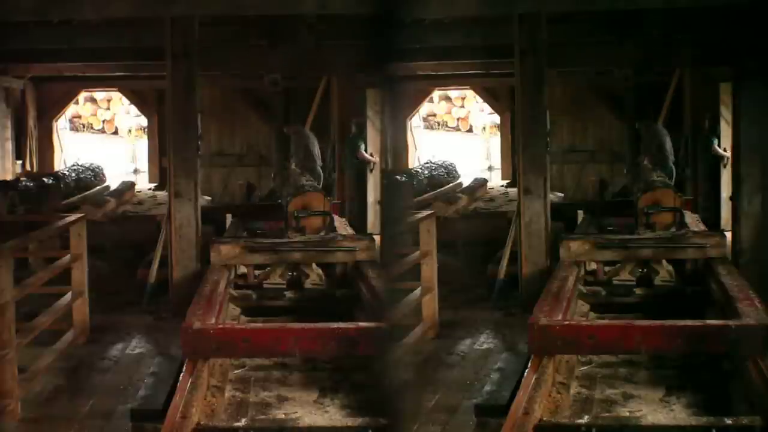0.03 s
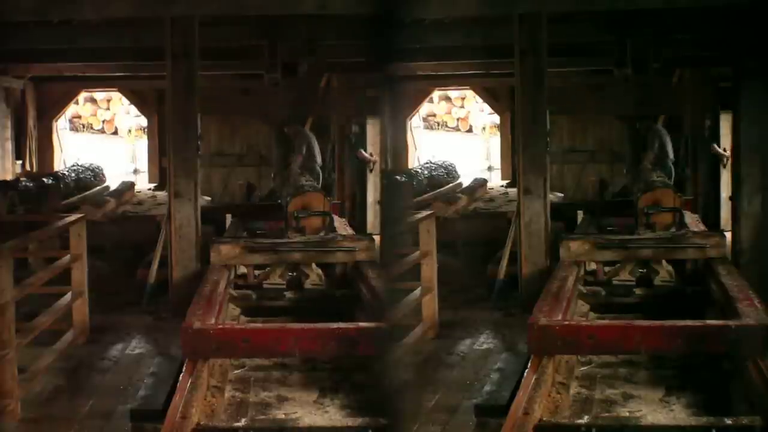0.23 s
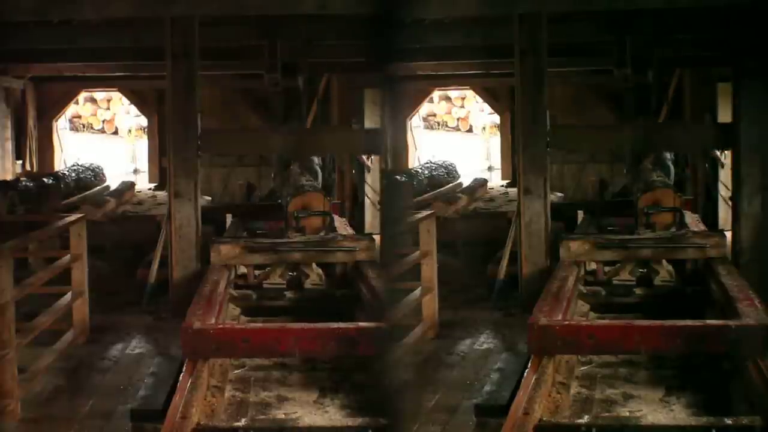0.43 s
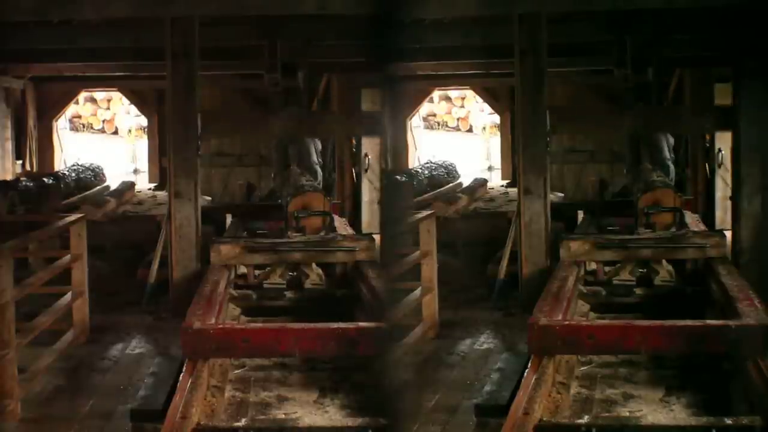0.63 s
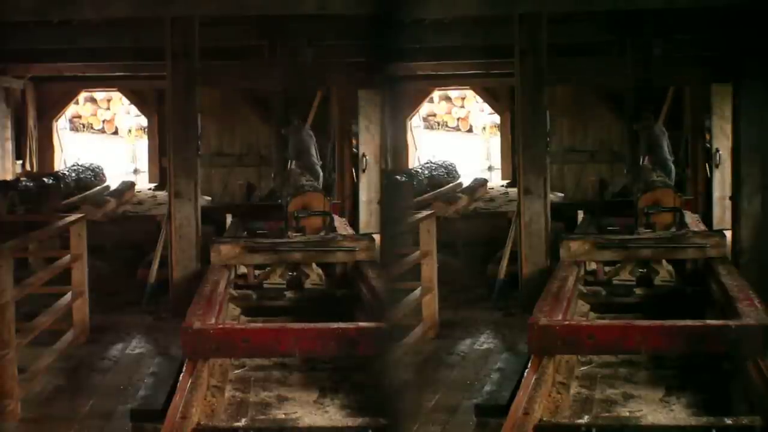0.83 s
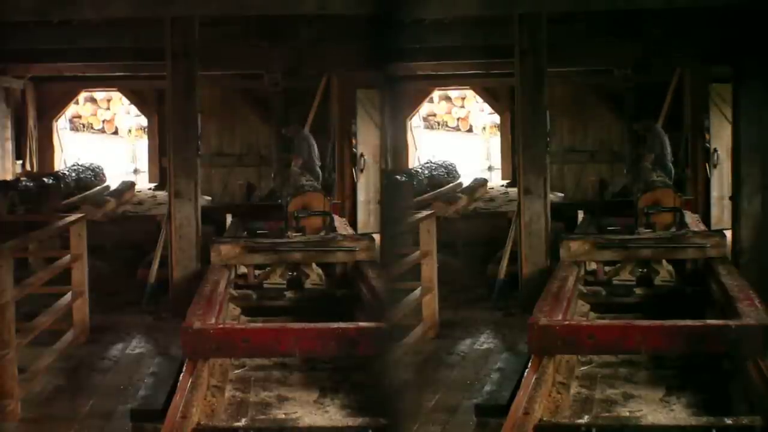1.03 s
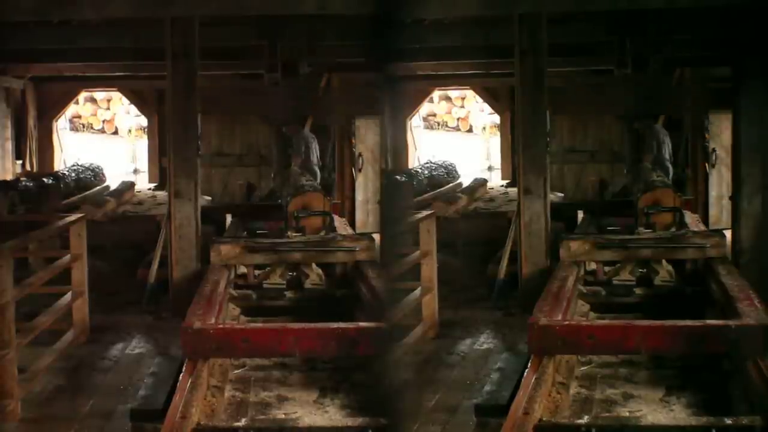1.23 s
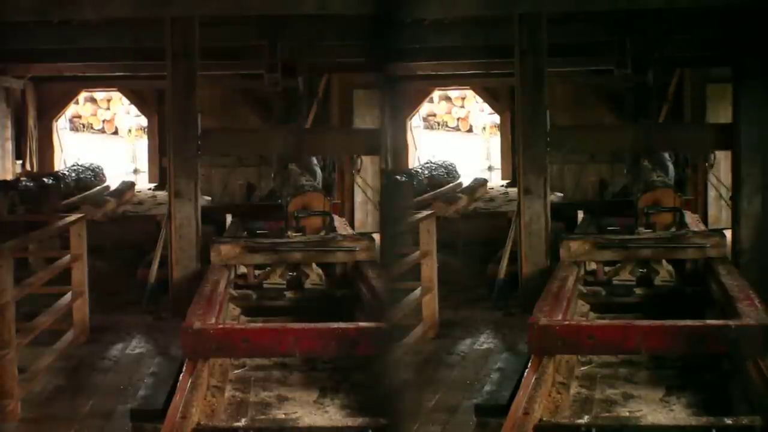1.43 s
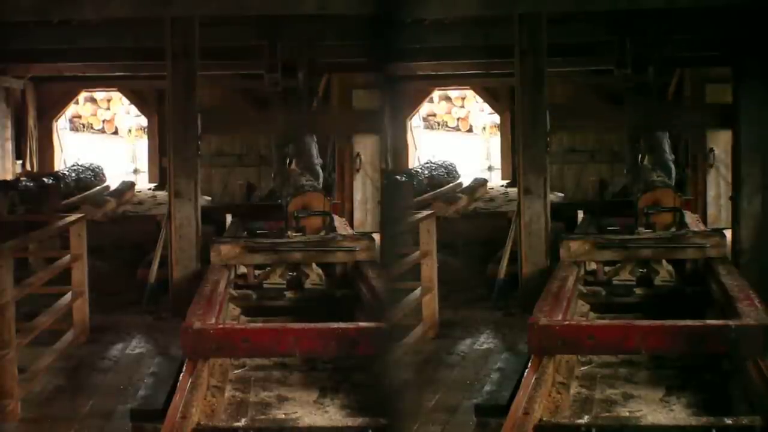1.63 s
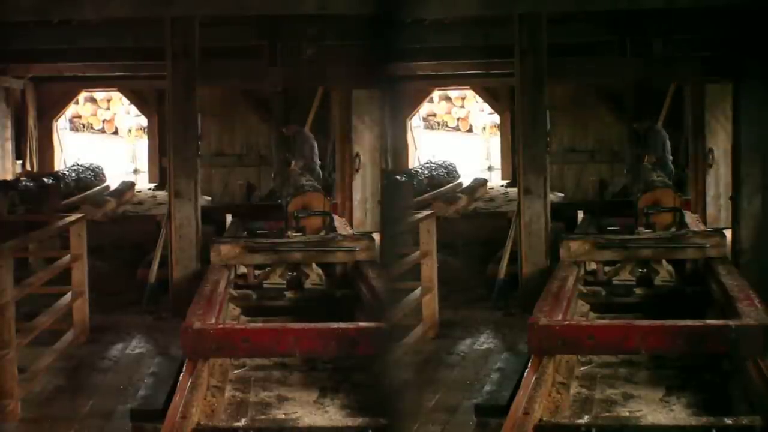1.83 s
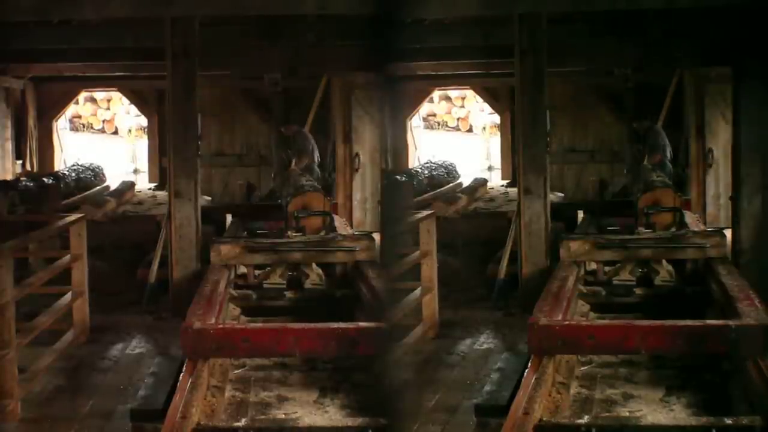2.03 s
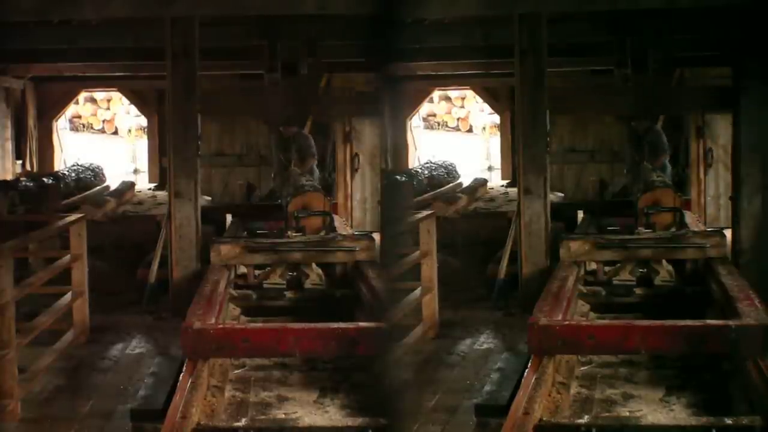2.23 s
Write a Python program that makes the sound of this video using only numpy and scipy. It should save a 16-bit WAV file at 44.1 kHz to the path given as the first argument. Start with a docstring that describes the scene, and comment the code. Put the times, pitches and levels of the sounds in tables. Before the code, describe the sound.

Three ringing iron clanks from a frame saw working inside a wooden mill.

```python
"""Inside a wooden mill, one microphone close to an old frame saw at work. Once per stroke an iron feed
part takes up its slack and drops home with a ringing clank that fills the timber room; the hardest
crack overloads the recorder. Before each clank the wooden frame rumbles; before the first two it also
scrapes. A faint hiss, one light slip and a few soft knocks lie in the background between the strokes."""
import sys
import numpy as np
from scipy import signal
from scipy.fft import rfft, irfft, next_fast_len
from scipy.io import wavfile
from scipy.ndimage import uniform_filter1d

SR = 44100
rng = np.random.default_rng(int(sys.argv[2]) if len(sys.argv) > 2 else 0)


def master_out(mix):
    """Clip the mix to full scale and print it as 16-bit PCM to the path in sys.argv[1]."""
    frames = np.transpose(np.atleast_2d(mix))
    ceiling = np.clip(frames, -1, 1)
    pcm = np.round(ceiling * 32767).astype(np.int16)
    wavfile.write(sys.argv[1], SR, pcm)


N = 101429
T = np.arange(N) / SR

# The feed part dropping home, close to the microphone: t/s, crack level/dB, crack tilt/(dB/octave),
# room level/dB, room tilt/(dB/octave), ring level/dB, thud level/dB
CLANKS = [(.1655, -4, -1, -17.5, -0.6, -21, -25.5), (1.0805, -7, 1, -17.5, -0.04, -21.5, -30.5),
          (1.9008, -9.5, 2, -16.5, -0.48, -21, -29.5)]
def clanks():
    """Each clank: a thud of timber, the crack of iron, the room's answer and the iron's ring."""
    out = np.zeros(N)
    thud_lead_s = 0.011
    for stroke, (s, crack_db, crack_tilt, room_db, room_tilt, ring_db, thud_db) in enumerate(CLANKS):
        add(out, s - thud_lead_s, amp(thud_db) * timber_thud(thud_lead_s))
        add(out, s, amp(crack_db) * iron_crack(crack_tilt))
        add(out, s, amp(room_db) * room_answer(room_tilt))
        add(out, s, amp(ring_db) * iron_ring(stroke))
    return out


# Short-lived resonances right at the contact: f/Hz, relative level/dB
CRACK_MODES = [(830, -5.5), (1860, 3), (2850, -7), (3450, -8), (4870, 1), (5500, -2), (6550, -8.5),
               (7550, -8.5)]
def iron_crack(tilt_db):
    """The contact chatters for a few milliseconds and drives broad, unsteady resonances."""
    size = 1024
    modes = np.zeros(size)
    for hz, db in CRACK_MODES:
        drift = 0.28 * np.cumsum(rng.standard_normal(size)) / np.sqrt(SR / 1000)  # random walk, radians
        phase = 2 * np.pi * (hz * T[:size] + rng.random()) + drift
        modes += amp(db + tilt_db * np.log2(hz)) * np.cos(phase)
    chatter = amp(-5.5) * noise(BLOW_SPECTRUM)[:size]
    fade = envelope(rise_s=0.0003, hold_s=0.0025, fall_s=0.0016)[:size]
    return unit_rms(unit_rms(modes) + chatter) * fade


# Modes of the iron as heard in the room; each blow lands on another spot:
# f/Hz, t60/s, relative level/dB in the first, second and third clank
IRON_MODES = [(441.7, 1, -9.5, -9, -20), (519, 0.77, -17, -17.5, -9), (1012, 0.72, -6, -12, -4.5),
              (1678, 0.61, -2.5, -11, -8), (2447, 0.49, 1.5, -6, 4.5), (2902, 0.61, -20, -5, -8),
              (2873, 0.49, -6.5, -5, -2.5), (3402, 0.47, -1, -5.5, -11), (4327, 0.48, -0.5, -3.5, -1.5),
              (4362, 0.54, 2.5, 0.5, -5), (4950, 0.51, -19, -8, -17), (5640, 0.53, -19, -6, -8),
              (5486, 0.44, -1, 0, 3), (5500, 0.56, -3.5, -16, -7), (5600, 0.47, -15, 2.5, 1.5),
              (6520, 0.43, 1.5, -1, -3.5), (7600, 0.43, -4, -7.5, 0), (7600, 0.41, 0, -9, -15),
              (8560, 0.36, -7, -6.5, -7.5)]
def iron_ring(stroke):
    """The iron's modes beat against their reflections and widen as the loose part rattles."""
    out = np.zeros(SR)
    direct = 0.29
    for hz, t60, *levels_db in IRON_MODES:
        reflections = beating(width_hz=25)
        rattle = amp(-8) * beating(width_hz=72)
        mode = ((direct + reflections + rattle) * np.exp(2j * np.pi * hz * T[:SR])).real
        fade = envelope(rise_s=0.008, hold_s=0.04, fall_s=t60 / np.log(1000))[:SR]
        out += amp(levels_db[stroke]) * unit_rms(mode) * fade
    return out / np.std(out[:6000])  # the loud opening sets the level


# Dense sound of the blow, filling the room around the microphone: f/Hz, relative level/dB
BLOW_SPECTRUM = [(15, -60), (50, -39), (75, -30), (115, -10), (250, -5.5), (550, 1), (1000, 0), (1350, -5),
                 (1850, -1), (2250, -4), (3100, 0), (3900, -3.5), (5400, 3.5), (6100, 2.5), (7700, -3),
                 (8800, -6), (10000, -16.5), (12500, -22.5), (15500, -25)]
# Decay of the timber room: f/Hz, t60/s
ROOM_DECAY = [(80, 0.4), (250, 0.82), (550, 0.79), (1500, 0.61), (4000, .47), (8000, 0.41), (14000, 0.29)]
def room_answer(tilt_db):
    """Dense reflections build quickly, hold briefly and die away, soonest in the treble."""
    rise_s, hold_s = 0.0019, 0.023
    hz, t, bands = signal.stft(noise(BLOW_SPECTRUM, tilt_db), SR, nperseg=256)
    decay_db = -60 * np.maximum(t - hold_s, 0) / curve_at(ROOM_DECAY, hz)[:, None]
    _, tail = signal.istft(bands * amp(decay_db), SR, nperseg=256)
    return tail[:N] * np.minimum(T / rise_s, 1)


# The timber at the feed, just ahead of the crack: f/Hz, relative level/dB
THUD_SPECTRUM = [(10, -45), (35, -33), (70, -56), (140, -11), (320, 1.5), (800, -8), (1500, 4),
                 (3000, -12.5), (7000, -16), (10000, -42), (15000, -65)]
def timber_thud(hold_s):
    """The timber thuds as the slack is taken up."""
    return noise(THUD_SPECTRUM) * envelope(rise_s=0.00038, hold_s=hold_s, fall_s=0.012)


# The sliding frame, and a light slip on its return: t/s, hold/s, level/dB, tilt/(dB/octave)
SCRAPES = [(-.02, 0.056, -35, -.5), (.117, 0.044, -25, -1.5), (.973, 0.039, -31, -2)]
SLIPS = [(1.508, .035, -43, -0.3)]
# Their colour at the microphone: f/Hz, relative level/dB
SCRAPE_SPECTRUM = [(20, -45), (100, -6), (400, 0.5), (800, -1.5), (1700, -1), (3000, -11.5), (6500, -9),
                   (9000, -18), (14000, -50)]
SLIP_SPECTRUM = [(300, -29), (1400, -11), (1900, -0.5), (2500, -9), (3600, -13.5), (7000, -10),
                 (10000, -21), (14000, -37)]
def friction(rubs, spectrum):
    """Short, grainy bursts of friction that fade in the room."""
    out = np.zeros(N)
    for s, hold_s, db, tilt_db in rubs:
        grain = noise(spectrum, tilt_db) * flutter(depth_db=0.5, size=100)
        add(out, s, amp(db) * grain * envelope(rise_s=0.0054, hold_s=hold_s, fall_s=0.075))
    return out


# Soft knocks of the timber, behind the clanks: t/s, f/Hz, level/dB
KNOCKS = [(.01, 111, -33), (0.067, 286, -25), (0.152, 320, -17), (0.409, 125, -40), (0.639, 131, -35),
          (0.743, 93, -39), (0.767, 155, -38), (0.876, 128, -36), (0.914, 230, -28), (0.941, 302, -25.5),
          (.955, 208, -29), (1.675, 254, -36.5), (1.807, 200, -50), (1.905, 172, -28), (1.933, 135, -32),
          (2.004, 175, -36)]
def joint_knocks():
    """Play in the wooden joints: low, quickly damped notes."""
    out = np.zeros(N)
    fade = envelope(rise_s=0.0082, hold_s=0.0082, fall_s=0.0068)
    for s, hz, db in KNOCKS:
        add(out, s, amp(db) * np.sin(2 * np.pi * hz * T) * fade)
    return out


# The running frame in the background, as it reaches the microphone: t/s, level/dB
RUMBLE_LEVEL = [(0, -44), (.16, -30.5), (.3, -53), (.55, -51.5), (.8, -48), (.98, -40.5), (1.1, -40),
                (1.35, -58.5), (1.6, -48.5), (1.85, -46), (2.1, -52.5), (2.3, -53)]
TIMBER_LEVEL = [(0, -31.5), (.13, -33.5), (.3, -56), (.55, -48.5), (.84, -45.5), (.94, -37.5), (1.06, -35),
                (1.25, -49.5), (1.45, -52), (1.65, -47.5), (1.82, -43.5), (2.1, -50), (2.22, -44.5),
                (2.3, -50)]
HISS_LEVEL = [(0, -38.5), (.15, -36), (.3, -50), (.55, -51), (.9, -46), (1.02, -42), (1.2, -46),
              (1.45, -52), (1.85, -45.5), (2.05, -48), (2.3, -50.5)]
# The colour of each layer: f/Hz, relative level/dB
RUMBLE_SPECTRUM = [(10, -43), (25, -50), (50, -17), (80, -8.5), (115, 2), (165, 1), (240, -2.5), (500, -36)]
TIMBER_SPECTRUM = [(60, -18), (140, -7), (240, -1.5), (340, -1), (550, -5), (900, -11.5), (1600, -16.5),
                   (4000, -54.5)]
HISS_SPECTRUM = [(20, -25), (200, 1), (800, -4.5), (2000, 2.5), (3800, -0.5), (6200, 3.5), (8000, -1.5),
                 (10000, -12.5), (12500, -25.5), (15500, -33)]
def running_frame():
    """Low rumble, the noise of the timber and a lightly fluttering hiss swell with the strokes."""
    rumble = swelling_noise(RUMBLE_LEVEL, RUMBLE_SPECTRUM)
    timber = swelling_noise(TIMBER_LEVEL, TIMBER_SPECTRUM)
    hiss = swelling_noise(HISS_LEVEL, HISS_SPECTRUM, flutter_db=1)
    return rumble + timber + hiss


def swelling_noise(levels, spectrum, flutter_db=0):
    """Coloured noise that follows a level curve."""
    swell = amp(np.interp(T, *np.transpose(levels)))
    return swell * noise(spectrum) * flutter(flutter_db, size=700)


def noise(spectrum, tilt_db=0):
    """Noise of rms 1 with a spectrum, tilted by tilt_db per octave."""
    size = next_fast_len(N)
    hz = np.fft.rfftfreq(size, 1 / SR)
    gain = amp(curve_at(spectrum, hz) + tilt_db * np.log2(hz + 1))
    return unit_rms(irfft(rfft(rng.standard_normal(size)) * gain, size)[:N])


def flutter(depth_db, size):
    """A random gain that changes over about size samples."""
    wander = uniform_filter1d(uniform_filter1d(rng.standard_normal(N), size), size)
    return amp(depth_db * unit_rms(wander))


def beating(width_hz, size=3000):
    """One second of random amplitude and phase: beats at about width_hz, even over size samples."""
    hz = np.fft.fftfreq(SR, 1 / SR)
    white = rng.standard_normal(SR) + 1j * rng.standard_normal(SR)
    sway = np.fft.ifft(white / (1 + (hz / width_hz) ** 2))
    return sway / np.sqrt(uniform_filter1d(abs(sway) ** 2, size) + 1e-20)


def envelope(rise_s, hold_s, fall_s):
    """Straight attack, then exponential release from hold_s after the onset."""
    return np.minimum(T / rise_s, 1) * np.exp(-np.maximum(T - hold_s, 0) / fall_s)


def amp(db):
    """Decibels to gain."""
    return 10 ** (np.asarray(db) / 20)


def unit_rms(x):
    """Scales to rms 1."""
    return x / np.sqrt(np.mean(x ** 2) + 1e-20)


def curve_at(points, hz):
    """Reads a curve on a log-frequency axis."""
    f, value = np.transpose(points)
    return np.interp(np.log(hz + 1), np.log(f + 1), value)


def add(mix, s, sound):
    """Mixes a sound in at time s."""
    at = round(s * SR)
    sound = sound[max(-at, 0):]
    part = mix[max(at, 0):][:len(sound)]
    part += sound[:len(part)]


def scene():
    """At the microphone, in mono: the running frame with clanks, scrapes and knocks over it."""
    mix = running_frame() + clanks()
    mix += friction(SCRAPES, SCRAPE_SPECTRUM) + friction(SLIPS, SLIP_SPECTRUM)
    return (mix + joint_knocks())[None]


def record(dry):
    """The hardest crack overloads the recorder, which is dull at the top and band-limited."""
    treble_hz, edge_hz = 11150, 15700
    dull = signal.lfilter(*signal.butter(2, treble_hz, fs=SR), dry)
    oversampled = signal.resample_poly(dull, 4, 1, axis=1)
    clipped = signal.resample_poly(np.clip(oversampled, -1, 1), 1, 4, axis=1)
    band_limit = signal.firwin(511, edge_hz, window=("kaiser", 9), fs=SR)
    return signal.oaconvolve(clipped, band_limit[None], "same")


dry = scene()
out = record(dry)
master_out(out)
```